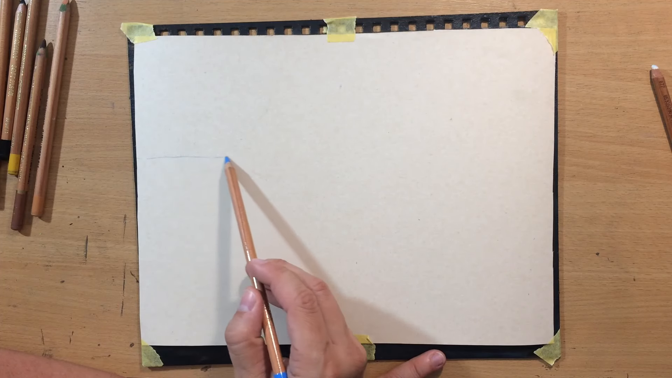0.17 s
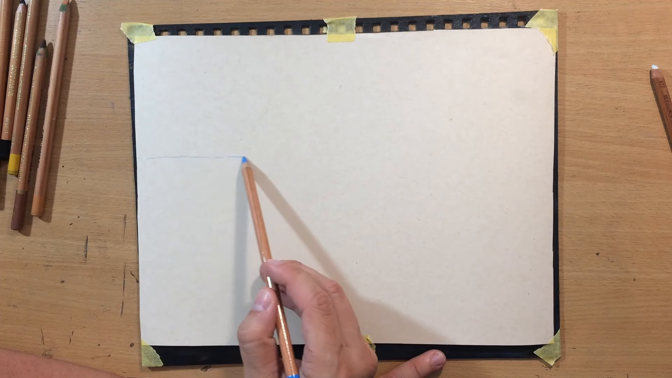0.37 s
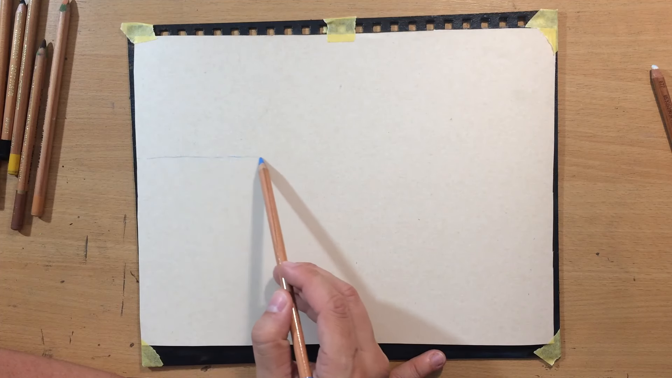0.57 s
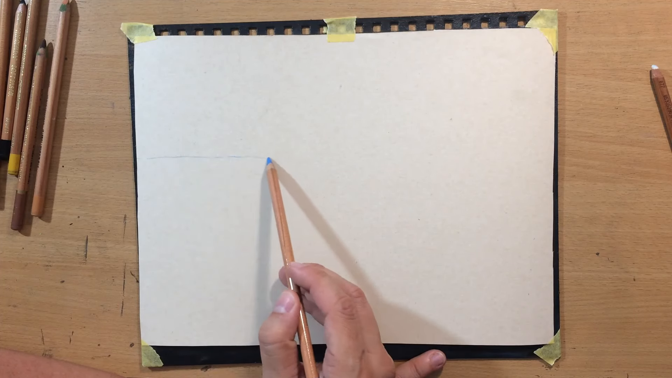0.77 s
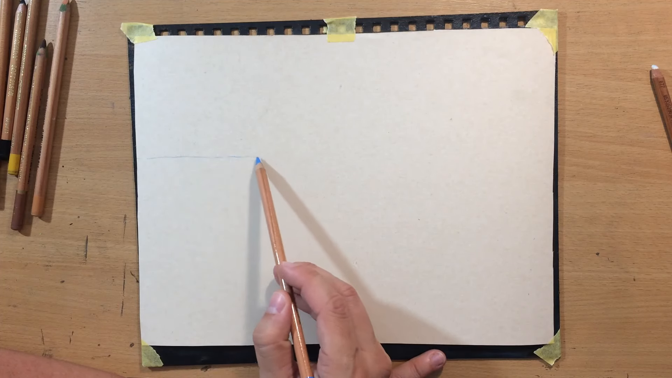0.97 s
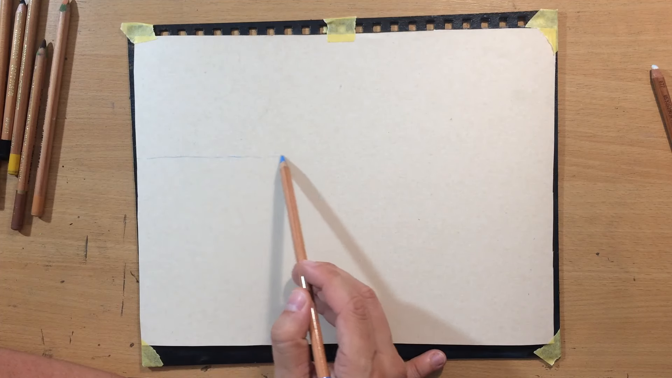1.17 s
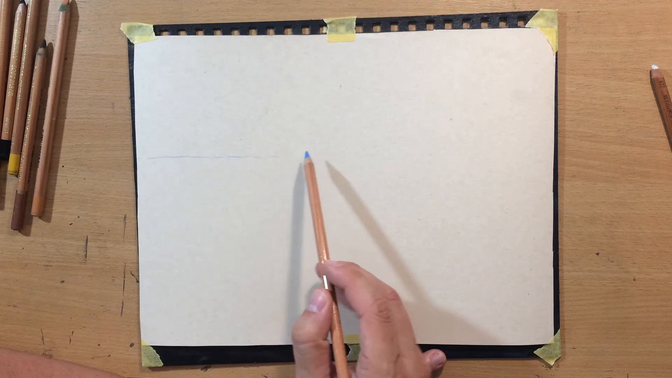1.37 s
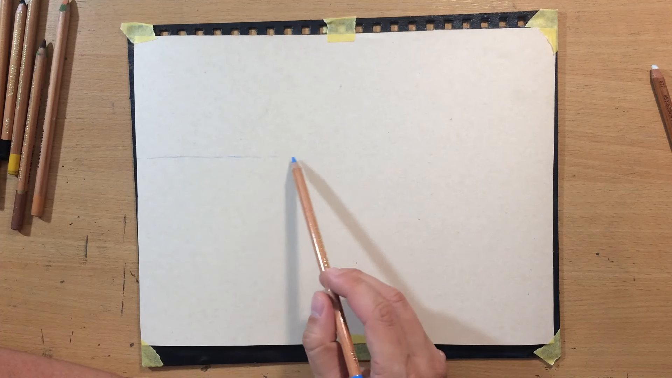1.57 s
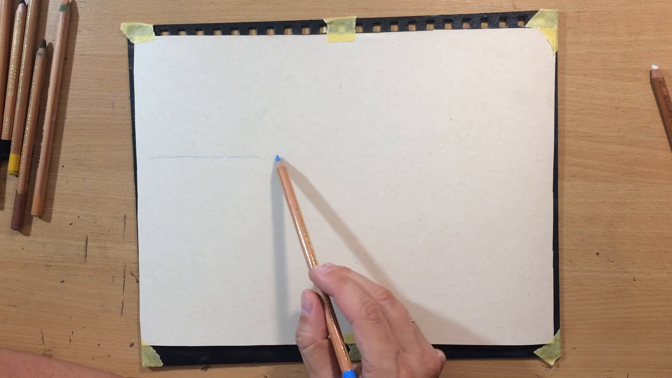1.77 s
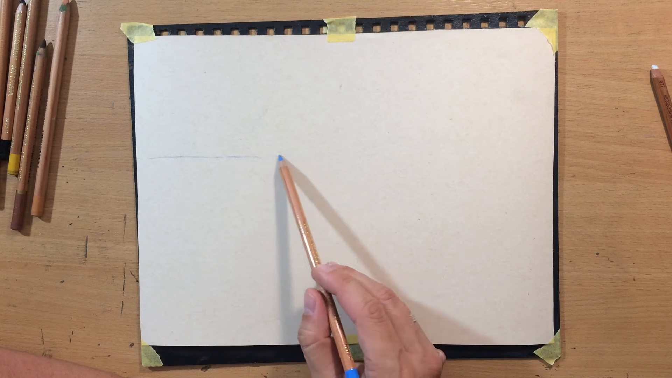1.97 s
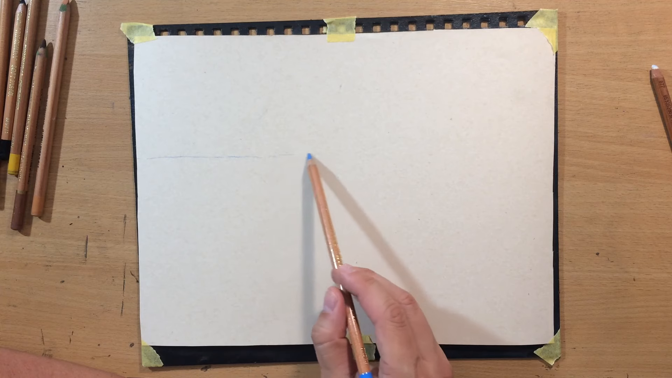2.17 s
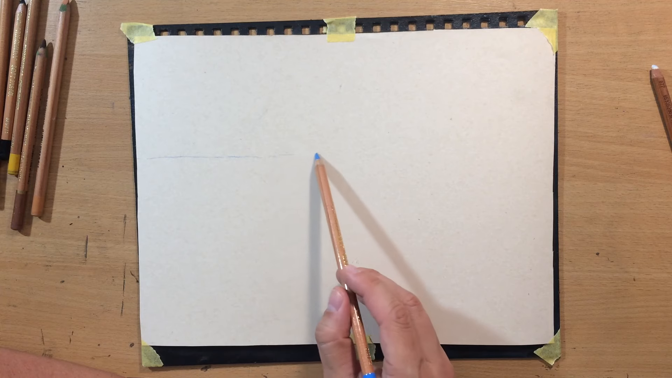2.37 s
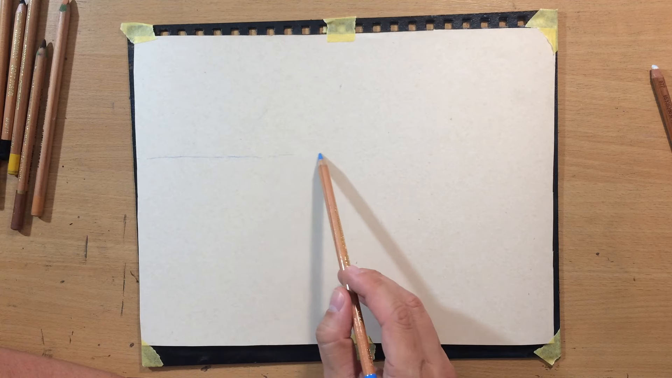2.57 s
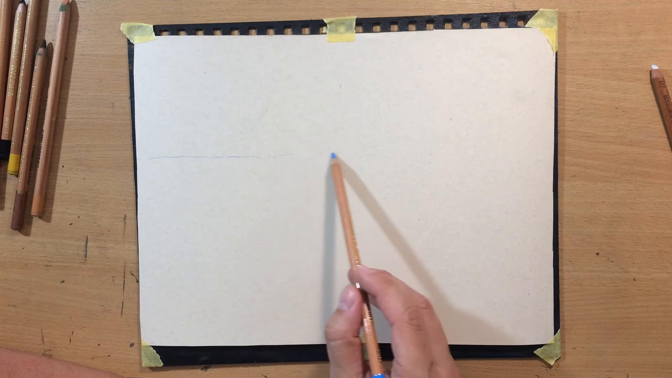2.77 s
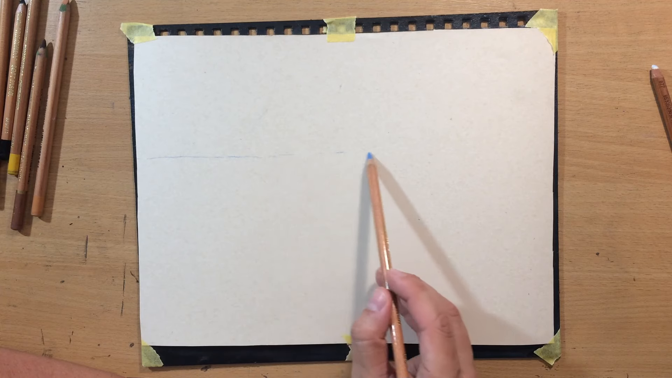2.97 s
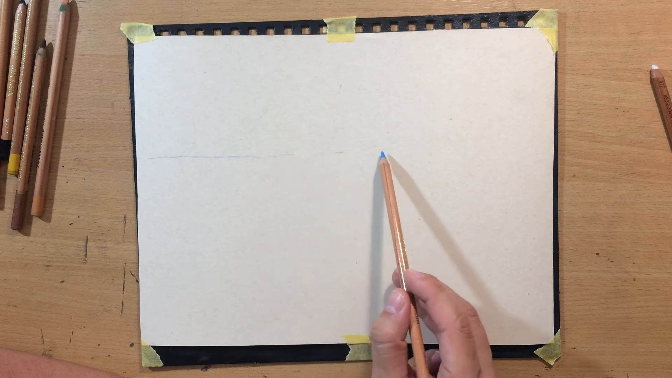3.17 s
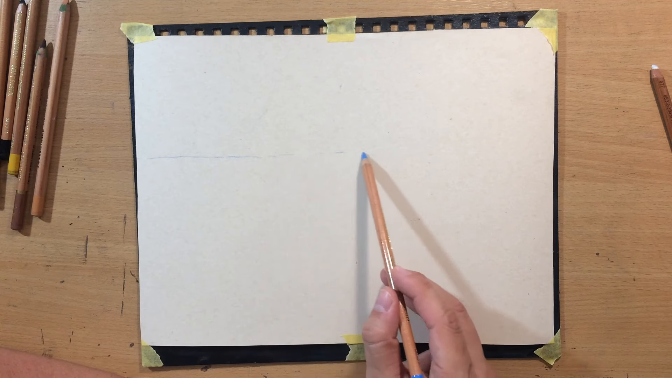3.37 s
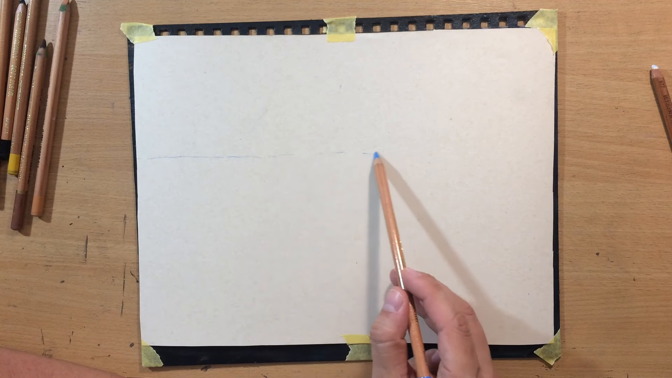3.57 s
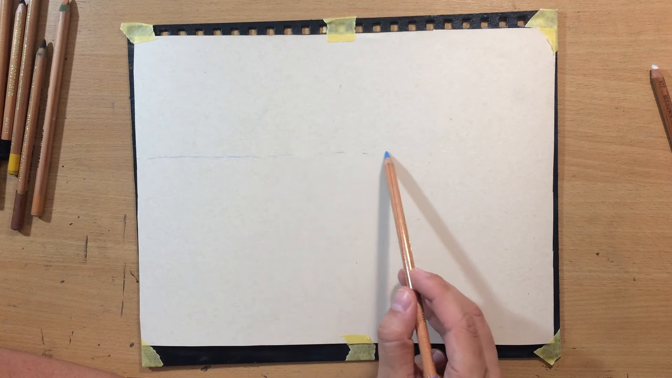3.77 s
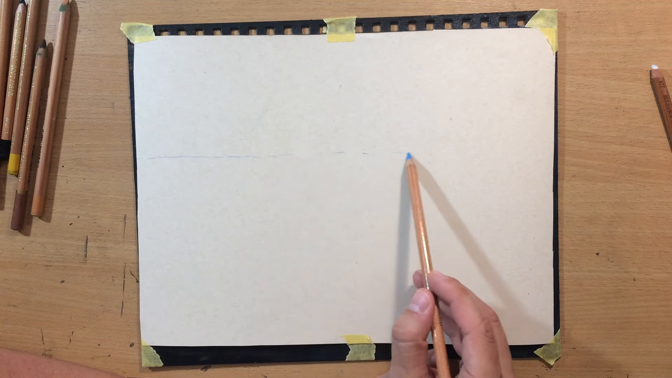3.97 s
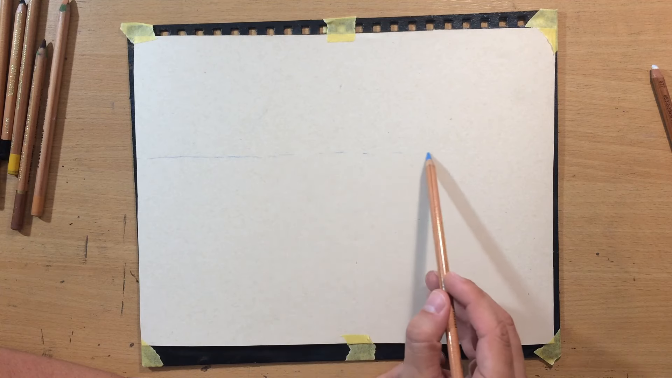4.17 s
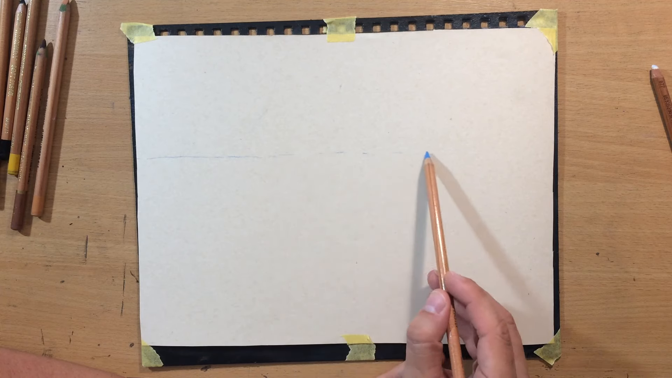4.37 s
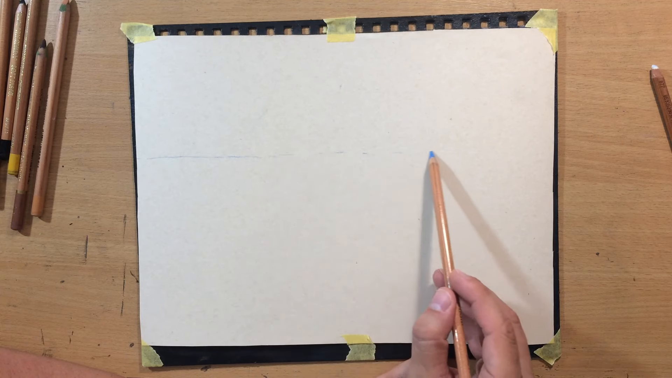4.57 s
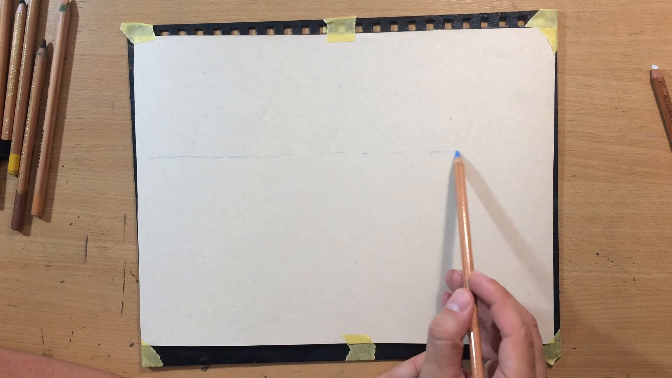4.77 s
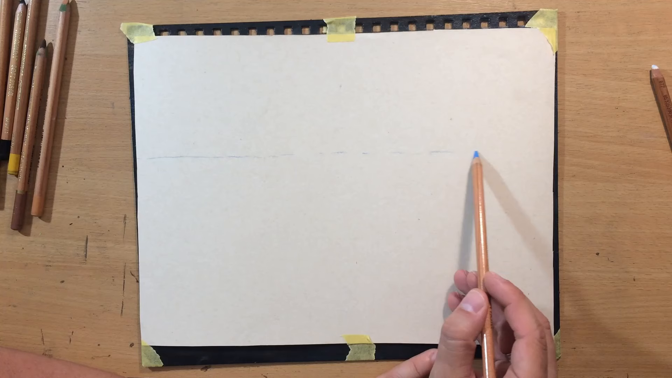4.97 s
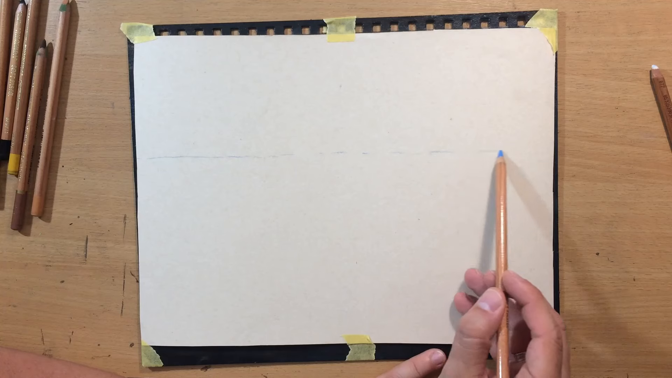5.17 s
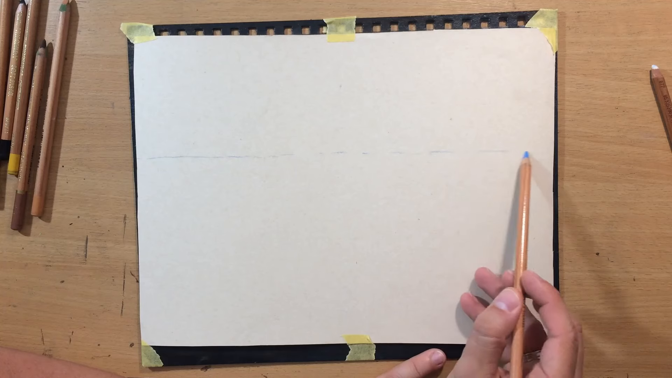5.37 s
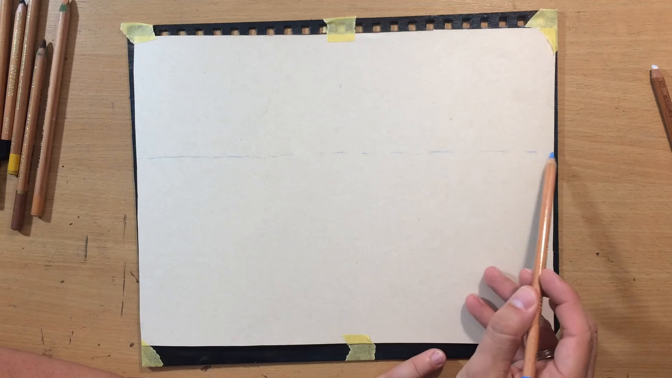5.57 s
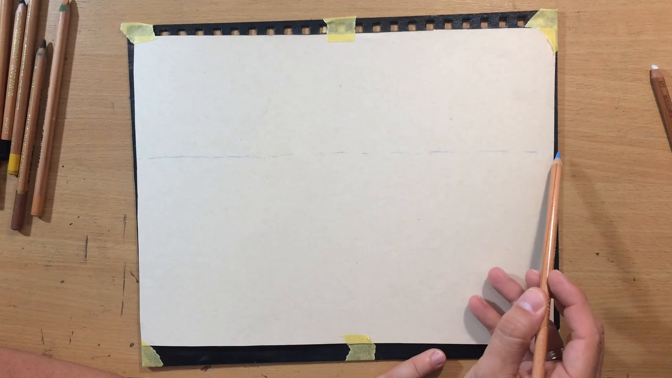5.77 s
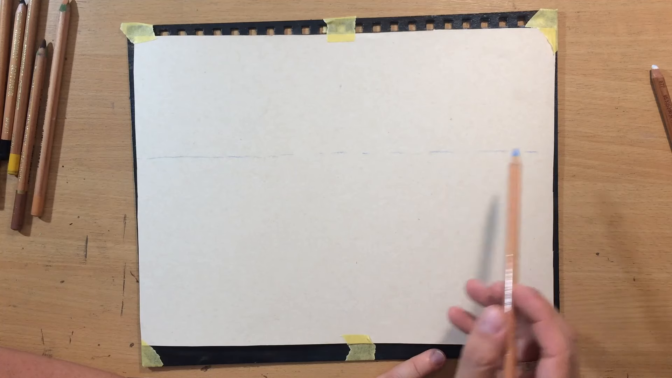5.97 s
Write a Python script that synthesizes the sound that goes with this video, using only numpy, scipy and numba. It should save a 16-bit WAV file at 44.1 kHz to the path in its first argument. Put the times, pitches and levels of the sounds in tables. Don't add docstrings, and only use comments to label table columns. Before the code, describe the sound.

Overhead phone microphone close to a wooden desk: dry, sandy pencil strokes with a woody ring and papery hiss. First one long fading stroke, then wood knocks bouncing and dying to faint taps, with the hand dragging softly. Brief flicks and hatches come with gaps between, then four firmer strokes in close succession. The low fan hum remains alone at the end.

```python
import sys
import numpy as np
from scipy import signal
from scipy.fft import rfft, irfft
from scipy.io import wavfile
from scipy.ndimage import uniform_filter1d
from numba import njit

SR = 44100
rng = np.random.default_rng(int(sys.argv[2]) if len(sys.argv) > 2 else 0)


def attenuation_scalar(level_db):
    decades = np.asarray(level_db, float) / 20
    return 10 ** decades


def output_pcm(signal):
    pcm = np.clip(np.atleast_2d(signal).T, -1, 1) * 32767
    wavfile.write(sys.argv[1], SR, np.round(pcm).astype(np.int16))


N = 265790

# frequency in Hz, level in dB per Hz.
PAPER_HISS = [(1470, -56), (2500, -9), (2770, -13.5), (3250, -6), (4580, -11), (5600, -4.5), (6640, -8),
              (7520, -9), (12300, -10.5), (16000, -9.5)]
# multiple of its ring, width in Hz, level in dB.
BARREL_MODES = [(1.43, 340, 0), (1.78, 450, -6), (2.52, 670, 2), (3.35, 600, -3.5), (4.25, 597, -7)]
# time in seconds, extra pressure in dB.
GRIT_CATCHES = [(.008, 3), (.022, 1), (.033, -2), (0.045, 4.5), (.068, 7), (.08, 0), (.092, 5.5), (.11, 2),
                (.175, 0), (.195, 5.5), (.245, 4.5), (.27, 1), (.285, 4), (0.305, 7.5), (.46, 6), (.48, 5),
                (.52, 0), (0.594, 2.5), (.716, 11.5), (0.809, 9), (1.212, 3), (1.232, 4), (1.245, 0),
                (1.262, 1), (2.148, 5), (2.198, 3.5), (2.212, -2), (2.382, 7.5), (2.925, 1), (2.978, 9),
                (3.645, 6.5), (3.985, 6.5), (4.07, 7.5), (4.207, 2.5), (4.24, 1), (4.693, 3), (4.87, 8),
                (4.878, 5.5), (4.98, 3), (5.005, 2), (5.03, -1), (5.048, 3), (5.065, 8), (5.155, 7.5),
                (5.218, 7.5), (5.232, 4), (5.242, 3), (5.253, -7), (5.269, 3.5), (5.281, 0), (5.376, 6.5),
                (5.582, 5.5), (5.617, 3)]


def pencil():
    t = np.arange(N) / SR
    drawn = strokes()
    s, *columns = np.concatenate(drawn).T
    hiss_db, ring_db, ring_hz, scrape_db, rasp_db = (np.interp(t, s, c) for c in columns)
    touch = 0
    for k, stroke in enumerate(drawn):
        landing = (t - stroke[0][0]) / 0.00024 + (k == 0)
        lifting = (stroke[-1][0] - t) / 0.0045
        touch = touch + np.clip(np.minimum(landing, lifting), 0, 1)
    catch_s = 0.0036
    ring_db = ring_db + sum(db * np.exp(-((t - at) / catch_s) ** 2) for at, db in GRIT_CATCHES)
    scrape_db = scrape_db - 3 + hiss_db + 0.36 * (ring_db - hiss_db)
    rasp_db = rasp_db - 15.5 + ring_db

    grains = grit(spread_db=3.5, patchy_db=0.5)
    push = grains * rng.standard_normal(N)
    judder = attenuation_scalar(1.87 * walk(70))
    bend = svf(svf(push, ring_hz, 580.0), ring_hz, 850.0)
    bend = level(bend * judder, -0.55)
    answer = level(board(grains * judder, ring_hz), 0.5)
    bend = level(held(attenuation_scalar(-1.0) * bend + answer), -1.27)

    barrel = sum(level(svf(push, m * ring_hz, 1. * w), db) for m, w, db in BARREL_MODES)
    paper = level(colour(sheet(grains, rate=12), PAPER_HISS), 0) + level(barrel, -3.5)
    scrape = level(colour(paper, [(4800, -10.0), (5400, -27.0)]), -0.47)
    hiss = level(colour(paper, [(4800, -23.5), (5400, -20)]), -1.07)
    rasp = level(held(band(band(push, 1460, 670), 1320, 1340)), -2.5)

    rub = attenuation_scalar(ring_db) * bend + attenuation_scalar(scrape_db) * scrape
    rub = rub + attenuation_scalar(hiss_db) * hiss + attenuation_scalar(rasp_db) * rasp
    rub = spots(touch * rub)
    return rub + attenuation_scalar(-10) * band(rub, 2180, 45)


# time in seconds, tip speed as hiss in dB, # pressure
# as ring in dB, ring frequency in Hz.
TRACED_STROKES = [
    [(0.0, -54.5, -43.5, 2480), (0.1, -56, -46, 2390), (0.22, -56, -49.5, 2330), (0.3, -54.5, -44.5, 2240),
     (0.33, -56, -50, 2260), (0.45, -52.5, -52.5, 2250), (0.458, -50, -47, 2290), (0.475, -49, -44, 2290),
     (0.6, -53.5, -44, 2160), (0.72, -58, -51.5, 2220), (0.765, -64.5, -54.5, 2170),
     (0.83, -64, -54.5, 2200)],
    [(2.111, -60, -49.5, 2020), (2.14, -49, -45.5, 2010), (2.19, -47.5, -42, 2200),
     (2.215, -51.5, -42.5, 2300), (2.228, -53, -58, 2150), (2.245, -58, -59, 2180)],
    [(3.955, -55, -54, 2000), (3.967, -50, -50, 1990), (4.07, -51.5, -49, 2040), (4.135, -59.5, -49, 2130),
     (4.2, -55, -45, 2240), (4.24, -53.5, -44.5, 2220), (4.256, -70, -57, 2250)],
    [(4.685, -53, -43, 2120), (4.73, -51, -50, 2000), (4.82, -50.5, -43, 2150), (4.885, -52, -43, 2190),
     (4.908, -59, -54, 2240)],
    [(4.968, -60, -49.5, 2070), (4.995, -56.5, -40, 2150), (5.075, -59.5, -50, 2180),
     (5.105, -55, -41.5, 2030), (5.15, -55.5, -44.5, 2000), (5.2, -54, -42, 2170), (5.27, -48.5, -39, 2220),
     (5.32, -54, -45, 2280), (5.375, -50, -43, 2210), (5.396, -60, -52, 2200)],
    [(5.495, -52.5, -51, 1970), (5.525, -51, -43, 2050), (5.555, -54, -47, 1980),
     (5.58, -52.5, -44.5, 2140), (5.62, -50, -39, 2350), (5.632, -56, -64, 2350)],
]
MORE_STROKES = [
    [(1.206, -61, -51, 2160), (1.211, -47, -42, 2200), (1.22, -47, -41, 2140), (1.25, -47, -45, 2180),
     (1.275, -44.5, -48, 2000), (1.29, -53, -48, 2050), (1.298, -53, -54, 2110), (1.306, -76, -61, 2200),
     (1.39, -90, -81, 2170)],
    [(2.539, -57, -57, 2030), (2.55, -54, -52, 2070), (2.575, -55, -52, 2000), (2.605, -58, -55, 1900),
     (2.625, -66, -62, 1890)],
    [(2.899, -49, -48, 2560), (2.911, -51, -48, 2340), (2.916, -42.5, -48.5, 2050),
     (2.96, -42.5, -44, 2140), (2.983, -44.5, -49, 2030), (2.996, -56, -63, 2050)],
]
# start in seconds, length in seconds, hiss in dB, ring in dB,
# share of the length where it is fastest, ring at the start in Hz, ring at the end in Hz.
DASHES = [
    (2.342, .2, -93.5, -58, 0.073, 2060, 1860),
    (3.095, .022, -54, -49.5, 0.2, 1820, 1960),
]
GRAZES = [
    (3.154, 0.17, -62.5, -65, 0.4, 2060, 1940),
    (3.588, 0.086, -43.5, -51, 0.7, 2030, 1970),
]
# scrape in dB, board rasp in dB.
GRIPS = [(-4.5, -3.5), (0.5, 0), (2.5, -7.5), (15, 10), (-1, 9), (-3.5, -23), (-4, -6), (3.5, -6), (-17, 8),
         (2, 2.5), (2, -10), (3.5, -7), (-4.5, 1)]


def strokes():
    short = [arch(r, rise_db=3, fall_db=10.5) for r in DASHES]
    short += [arch(r, rise_db=20.5, fall_db=21) for r in GRAZES]
    ordered = sorted(TRACED_STROKES + MORE_STROKES + short)
    return [[(*row, *grip) for row in stroke] for stroke, grip in zip(ordered, GRIPS)]


def arch(row, rise_db, fall_db):
    s, length, hiss_db, ring_db, peak, hz, end_hz = row
    course = [(0, rise_db), (peak / 2, rise_db / 4), (peak, 0), ((1 + peak) / 2, fall_db / 4), (1, fall_db)]
    return [(s + u * length, hiss_db - d, ring_db - d, hz + u * (end_hz - hz)) for u, d in course]


def grit(spread_db, patchy_db):
    pluck_db = spread_db * np.minimum(rng.exponential(size=N), 5)
    return attenuation_scalar(pluck_db + patchy_db * walk(90))


def sheet(grains, rate):
    out, pluck = 0, rng.standard_normal(N)
    for k, hz in enumerate(np.arange(2600, 15900, 550)):
        drift = hz + 130 * walk(4)
        swell = attenuation_scalar(2.6 * walk(rate))
        out = out + swell * svf(grains * np.roll(pluck, 999 * k), drift, 430.)
    return out


def board(grains, ring_hz):
    reach_hz, width_hz, swell_db = 345, 129., 3
    out, pluck = 0, rng.standard_normal(N)
    for k, hz in enumerate(np.arange(1500, 3400, 140)):
        near = attenuation_scalar(swell_db * walk(22)) / (1 + ((hz - ring_hz) / reach_hz) ** 2)
        out = out + near * svf(grains * np.roll(pluck, 777 * k), hz + 40 * walk(8), width_hz)
    return out


def held(x):
    hold_s, share = 0.012, 0.7
    k = int(hold_s * SR)
    power = uniform_filter1d(uniform_filter1d(x ** 2, k), k)
    return level(x / (power + 1e-9) ** (share / 2), 0)


# start in seconds,
# length in seconds, centre at the start in Hz, centre at the end in Hz, gain in dB.
SHEET_SPOTS = [(0, 0.35, 2630, 2480, 2), (0, 0.56, 3030, 2860, 1), (0, .45, 6750, 6800, 0),
               (.45, 0.26, 3300, 3300, -1), (0, 0.72, 2450, 2150, 3.5), (1.206, 0.13, 2150, 2140, 6.5),
               (1.208, 0.13, 3900, 3800, 5), (1.206, 0.08, 2750, 2680, -9), (2.11, 0.082, 2900, 2900, -5),
               (2.11, 0.15, 4230, 4000, 2), (2.35, 0.088, 4000, 4100, 15), (2.54, 0.066, 3570, 3470, 6.5),
               (2.54, .08, 4300, 4300, -8), (2.54, .08, 6700, 6700, 2), (2.9, 0.054, 3500, 3600, 5.5),
               (2.9, .1, 4360, 4350, -1), (2.9, 0.12, 7000, 6950, 4), (3.59, .085, 5600, 5570, -10),
               (3.955, 0.23, 3900, 3900, 1.5), (3.955, .3, 5500, 5600, 0.5), (4.685, 0.27, 3150, 3200, 1.5),
               (4.685, .22, 2740, 2730, -4), (4.968, 0.21, 3150, 3150, 5.5), (4.968, .43, 4730, 4850, -17),
               (5.1, 0.2, 5400, 5800, 5.5), (4.968, 0.35, 6140, 6600, -5), (5.1, 0.31, 2560, 2640, 5),
               (5.22, .17, 7400, 7800, 2.5), (5.495, 0.1, 4470, 4450, -9), (5.495, 0.2, 3400, 3580, 4),
               (5.495, .14, 5600, 5600, 1.5), (5.56, .075, 2700, 2800, 4), (1.206, 0.069, 1750, 1810, 3),
               (2.555, .06, 1930, 1900, 3), (3.62, 0.092, 1990, 1950, 5), (5.2, 0.18, 4200, 4300, -2)]
DESK_GAPS = [(.3, 0.43, 6750, 6850, -11), (.05, .25, 4580, 4900, -7), (2.54, .08, 6700, 6600, -6),
             (2.54, .08, 5800, 5800, 1), (2.9, .09, 4150, 4170, -7), (2.9, 0.08, 8000, 8100, -3),
             (4.79, .12, 4850, 4960, -8), (4.98, 0.082, 5950, 6150, -7), (5.07, .1, 6200, 6250, -8),
             (5.15, .09, 4600, 4700, -9), (5.5, .08, 4400, 4400, -9), (3.59, .085, 5700, 5700, -11),
             (4.05, .2, 13300, 13300, -8), (0, .5, 11000, 11100, -7), (4.702, .2, 9900, 10200, -1),
             (5.0, .39, 14000, 14200, -6)]


def spots(x):
    out = x.copy()
    bands = [(*r, 0.073) for r in SHEET_SPOTS] + [(*r, 0.046) for r in DESK_GAPS]
    for s, length, hz, end_hz, db, share in bands:
        i = max(int(s * SR), 0)
        u = np.linspace(0, 1, int(length * SR))
        fade = np.clip(np.minimum(u + (s < .01), 1 - u) * length / .015, 0, 1)
        part = svf(out[i:i + len(u)], hz + (end_hz - hz) * u, share * hz)
        add(out, i / SR, (attenuation_scalar(db * fade) - 1) * part)
    return out


# time in seconds, crack in dB, thud in dB, hardness in dB per octave,
# click in dB over the crack, share of the free ring time.
KNOCKS = [
    (1.1305, -34, -34, 3, -4, 0.75),
    (1.1696, -34, -33.5, 4, -2.5, 0.45),
    (1.1785, -39, -38, 1, -8, 0.65),
    (1.1829, -35.5, -30, 4, -1, 0.99),
    (1.4528, -34.5, -35.5, 0.5, -5, .5),
    (1.699, -47, -42, 9.5, -12, 0.42),
    (1.852, -53.5, -44, 7, 2, 0.18),
    (1.948, -61, -61, 7, 4, .3),
    (2.036, -56, -51, 3, 9, 0.55),
    (2.239, -39, -45, 12, -6, 0.59),
]
# frequency in Hz, level in dB, t60 in seconds.
CRACK_MODES = [(1500, -8.5, 0.049), (3000, 2.5, 0.025), (2350, -4, .015), (3430, -5, 0.0042),
               (4950, 8.5, 0.0088), (5300, -12, 0.054)]
THUD_MODES = [(131, 6, 0.084), (232, -1, 0.25), (293, -8, 0.047), (340, -7, 0.16), (450, 2, 0.021),
              (620, 6.5, 0.032), (755, -4, 0.1), (956, -11, 0.16), (1390, -7, 0.06)]
WAVE_DB = [-45, -33.5, -62, -33.5, -32, -38.5, -46.5, -62, -53, -61]


def knocks():
    out = np.zeros(N)
    chance_db = 2.0 * rng.standard_normal((len(KNOCKS), 15))
    t = np.arange(SR // 50) / SR
    click_hz = np.full(len(t), 3900.)
    octaves = np.log2(np.transpose(THUD_MODES)[0] / 370)
    for (s, crack_db, thud_db, hard_db, click_db, free), c, wave_db in zip(KNOCKS, chance_db, WAVE_DB):
        chatter = rng.standard_normal(len(t)) * np.exp(-t / .0016)
        crack = np.convolve(chatter, ring(CRACK_MODES, c[:6], free))
        click = svf(svf(chatter, click_hz, 6000.), click_hz, 6500.)
        spread = (1 + .5 * rng.standard_normal(len(t))) * t * np.exp(-t / 0.000076)
        thud = np.convolve(spread, ring(THUD_MODES, c[6:] + hard_db * octaves, min(free + 0.23, 1)))
        add(out, s, attenuation_scalar(crack_db) * crack / np.abs(crack).max())
        add(out, s, attenuation_scalar(crack_db + click_db) * click)
        add(out, s, attenuation_scalar(wave_db) * wave())
        add(out, s, attenuation_scalar(thud_db) * thud / np.abs(thud).max())
    return colour(out, [(40, -28), (110, 0), (6500, 1), (11000, -7)])


def ring(modes, scatter_db, free):
    t = np.arange(SR // 5) / SR
    y = 0
    for k, ((hz, db, t60), scatter) in enumerate(zip(modes, scatter_db)):
        decay = 1000. ** (-t / (t60 * free))
        y = y + (-1) ** k * attenuation_scalar(db + scatter) * np.sin(2 * np.pi * hz * t) * decay
    return y / np.abs(y).max()


def wave():
    start_hz, glide_s, rise_s = 500, 0.0034, 0.0034
    t = np.arange(SR // 25) / SR
    phase = 2 * np.pi * np.cumsum(start_hz / (1 + t / glide_s)) / SR
    y = t * np.exp(-t / rise_s) * np.sin(phase)
    return y / np.abs(y).max()


# time in seconds, frequency in Hz, level in dB, t60 in seconds.
DESK_NOTES = [(1.1305, 703, -40, .06), (1.1305, 560, -40, 0.043), (1.17, 900, -46, .04),
              (1.171, 1530, -42, .04), (1.183, 620, -38, 0.055), (1.186, 793, -44, 0.11),
              (1.184, 1500, -42, 0.036), (1.4527, 870, -42, 0.043), (1.4524, 1416, -45, 0.034),
              (1.4535, 2350, -49, .03), (1.699, 1405, -54, 0.026), (1.701, 1000, -52, 0.026),
              (1.853, 774, -45, 0.05), (1.995, 850, -53, .04), (2.037, 737, -52, 0.049)]


def desk_notes():
    out, t = np.zeros(N), np.arange(SR // 5) / SR
    rise = 1 - np.exp(-t / 0.0018)
    for s, hz, db, t60 in DESK_NOTES:
        add(out, s, attenuation_scalar(db) * rise * np.sin(2 * np.pi * hz * t) * 1000. ** (-t / t60))
    return out


# time in seconds, level in dB, resonance in Hz, t60 in seconds.
TICKS = [
    (1.6544, -56, 9500, 0.014),
    (2.0613, -49.5, 5860, 0.018),
    (2.2394, -45, 3650, 0.02),
    (2.3188, -40.5, 3950, 0.063),
    (2.3465, -40.5, 3840, 0.023),
    (3.5345, -53.5, 6940, 0.02),
    (2.3465, -49, 6050, .015),
    (2.874, -49.5, 5200, 0.14),
    (2.874, -50, 3200, .04),
    (2.874, -50, 7800, 0.059),
]
DULL_TICKS = [
    (0.456, -48, 2240, 0.035),
    (2.346, -40.5, 2030, 0.019),
    (2.875, -44.5, 2100, 0.043),
    (4.689, -34.5, 2150, 0.038),
    (5.855, -46.5, 1480, 0.02),
    (2.114, -46, 1900, .02),
    (3.955, -44, 3340, .02),
]


def ticks():
    out = np.zeros(N)
    t = np.arange(SR // 10) / SR
    for s, db, hz, t60 in TICKS + DULL_TICKS:
        burst = rng.standard_normal(len(t)) * 1000. ** (-t / max(t60, .004))
        tone = svf(burst, np.full(len(t), 1. * hz), 0.26 * hz)
        tick = tone / np.abs(tone).max() + 0.12 * np.diff(burst, prepend=0)
        add(out, s, attenuation_scalar(db) * tick)
    return out


# time in seconds, fade in dB per second, rustle in dB, rumble in dB.
HAND_SHIFTS = [
    (1.11, 50, -65, -54),
    (1.25, 50, -65, -82),
    (1.45, 39, -72, -59),
    (1.72, 27, -68, -62.5),
    (2.2, 37, -63, -56.5),
    (3.0, 43, -86, -86),
    (3.35, 5, -90, -71.5),
    (3.75, 43, -75, -81),
]


def hand():
    t = np.arange(N) / SR
    drag = grit(spread_db=1.5, patchy_db=1.5) * rng.standard_normal(N)
    rustle = level(band(band(drag, 1900, 3600), 1800, 3000), 0)
    low = band(band(rng.standard_normal(N), 170, 260), 200, 320)
    rumble = level(attenuation_scalar(2.5 * walk(25)) * low, 0)
    out = 0
    for s, fade_db, rustle_db, rumble_db in HAND_SHIFTS:
        effort = attenuation_scalar(np.minimum(189 * (t - s), -fade_db * (t - s)))
        out = out + effort * (attenuation_scalar(rustle_db) * rustle + attenuation_scalar(rumble_db) * rumble)
    return out


# frequency in Hz, level in dB, wander in Hz.
FAN_HUM = [(173.5, -54.5, 0.35), (655, -78.5, 2.52), (1663, -77.5, 5.03)]
# frequency in Hz, width in Hz, level in dB.
ROOM_MODES = [(122.7, 6.8, -67.5), (203.4, 8.6, -62.5), (239.6, 37, -67.5), (281, 16, -68.5),
              (316.8, 15.3, -70)]
# frequency in Hz, level in dB per Hz.
FAN_AIR = [(15, -80), (25, -22.5), (114, -14.5), (145, -9.5), (175, -5.5), (229, -51), (317, -9.5),
           (353, -23.5), (404, -19), (773, -23), (1600, -25), (2470, -29.5), (16000, -44)]


def fan():
    out = level(colour(rng.standard_normal(N), FAN_AIR), -62)
    for hz, db, wander_hz in FAN_HUM:
        swell = attenuation_scalar(1.4 * (hz / 173) ** 0.32 * walk(6.5))
        phase = 2 * np.pi * np.cumsum(hz + wander_hz * walk(5.4)) / SR
        out = out + level(swell * np.sin(phase), db)
    for hz, width, db in ROOM_MODES:
        out = out + level(band(band(rng.standard_normal(N), hz, width), hz, 2 * width), db)
    return out


@njit
def walls(x, lags, gain, damp):
    line, soft, out = np.zeros((8, 4096)), np.zeros(8), np.zeros(len(x))
    for i in range(len(x)):
        total = 0.
        for k in range(8):
            soft[k] += (1 - damp) * (gain[k] * line[k, (i - lags[k]) & 4095] - soft[k])
            total += soft[k]
        out[i] = soft[0] - soft[3] + soft[5] - soft[6]
        for k in range(8):
            line[k, i & 4095] = x[i] + soft[k] - total / 4
    return out


@njit
def svf(x, hz, width):
    y, b, l = np.empty(len(x)), 0., 0.
    for i in range(len(x)):
        g, k = np.tan(np.pi * hz[i] / SR), width / hz[i]
        v = (b + g * (x[i] - l)) / (1 + g * (g + k))
        b, l, y[i] = 2 * v - b, l + 2 * g * v, k * v
    return y


def band(x, hz, width):
    return svf(x, np.full(N, 1. * hz), 1. * width)


def colour(x, points):
    hz, db = np.transpose(points)
    bins = np.maximum(np.fft.rfftfreq(N, 1 / SR), 1)
    return irfft(rfft(x) * attenuation_scalar(np.interp(np.log(bins), np.log(hz), db)), N)


def level(x, db):
    return x * attenuation_scalar(db) / np.sqrt(np.mean(x ** 2))


def walk(rate):
    k = int(SR / rate)
    steps = np.repeat(rng.standard_normal(N // k + 1), k)
    return level(uniform_filter1d(uniform_filter1d(steps, k), k)[:N], 0)


def add(out, s, sound):
    i = int(s * SR)
    out[i:i + len(sound)] += sound[:N - i]


def scene():
    scratch = pencil() + ticks()
    blows = knocks() + desk_notes()
    lags = np.array([433, 571, 683, 829, 977, 1153, 1327, 1531])
    t60_s = 0.39
    tail = walls(scratch + .25 * blows + 1e-18, lags, attenuation_scalar(-60 * lags / SR / t60_s), 0.012)
    return (scratch + blows + attenuation_scalar(-28.5) * 4 * tail + hand() + fan())[None]


def roll_off(x):
    return signal.sosfilt(signal.butter(12, 15720, fs=SR, output="sos"), x)


def record(dry):
    low_pass = signal.ellip(8, .2, 70, 15650, fs=SR, output="sos")
    mix = signal.sosfilt(low_pass, dry)
    return roll_off(mix)


dry = scene()
out = record(dry)
output_pcm(out)
```